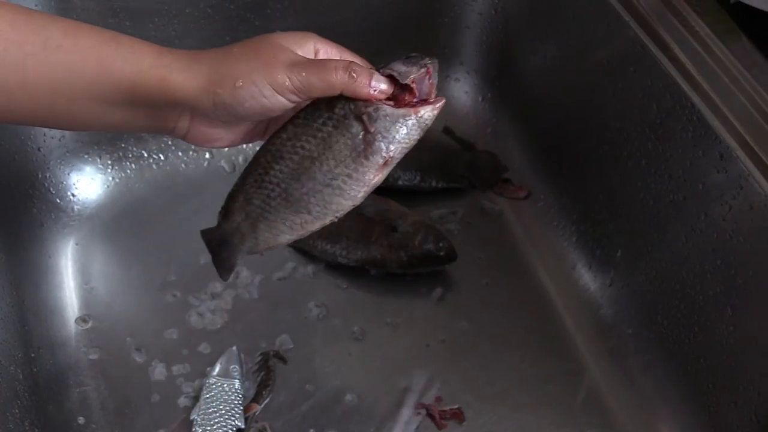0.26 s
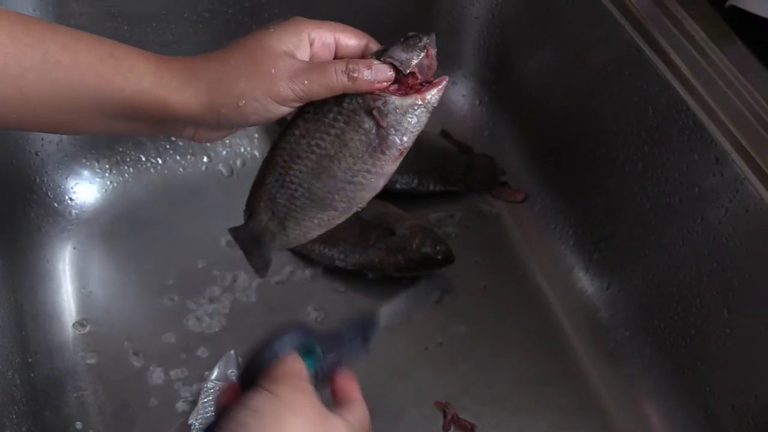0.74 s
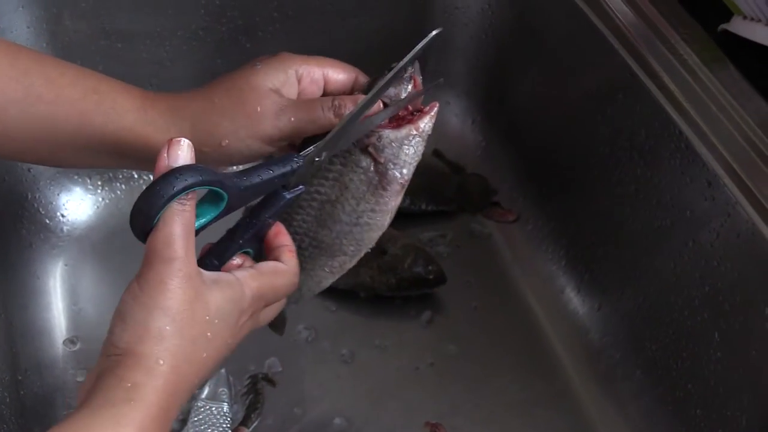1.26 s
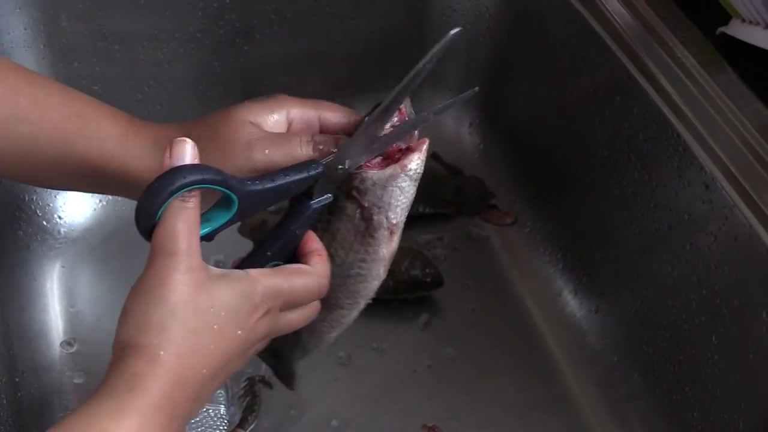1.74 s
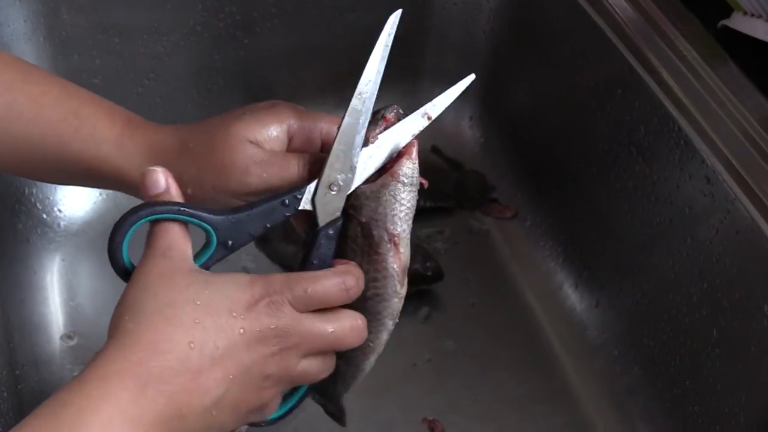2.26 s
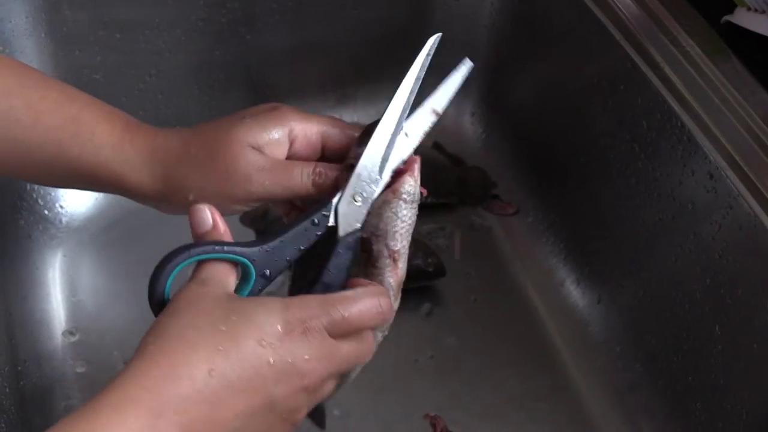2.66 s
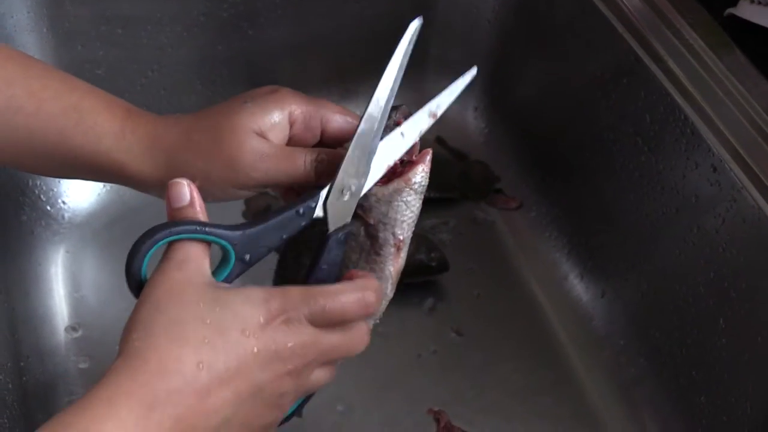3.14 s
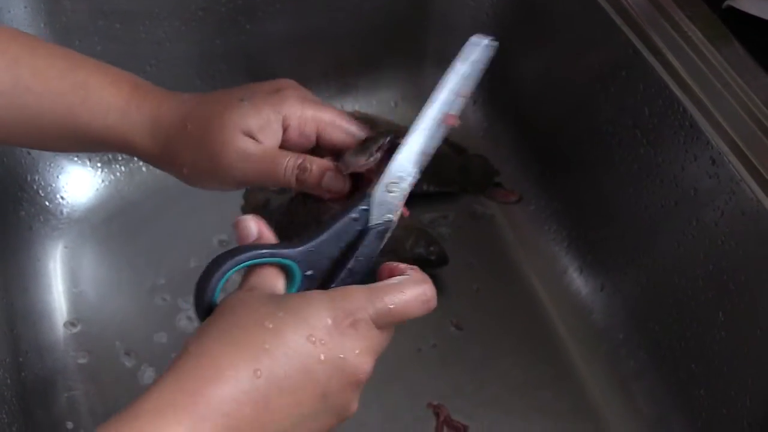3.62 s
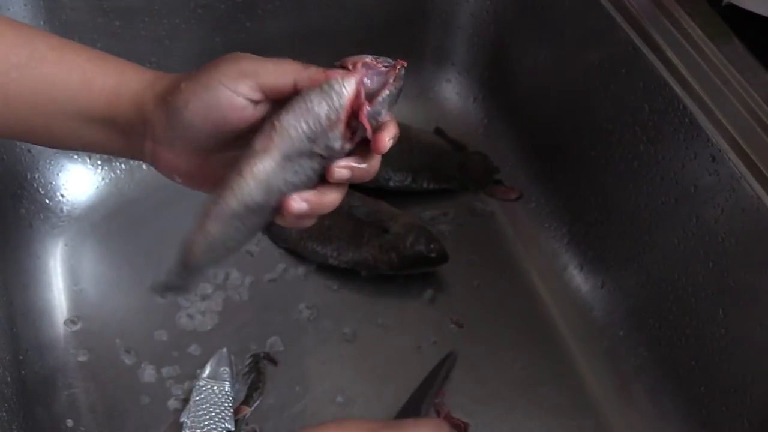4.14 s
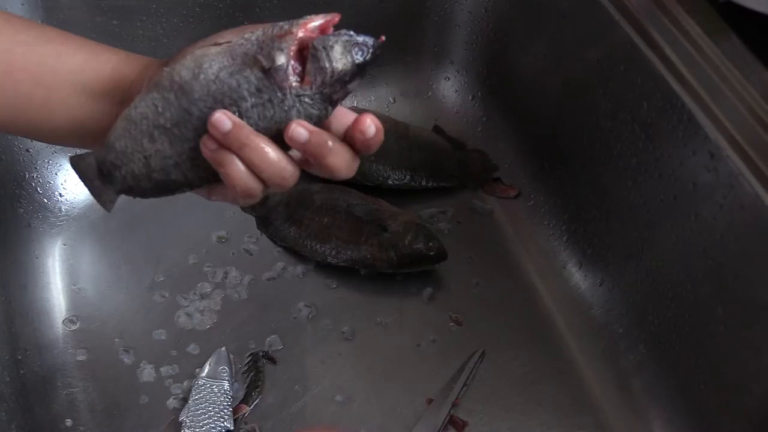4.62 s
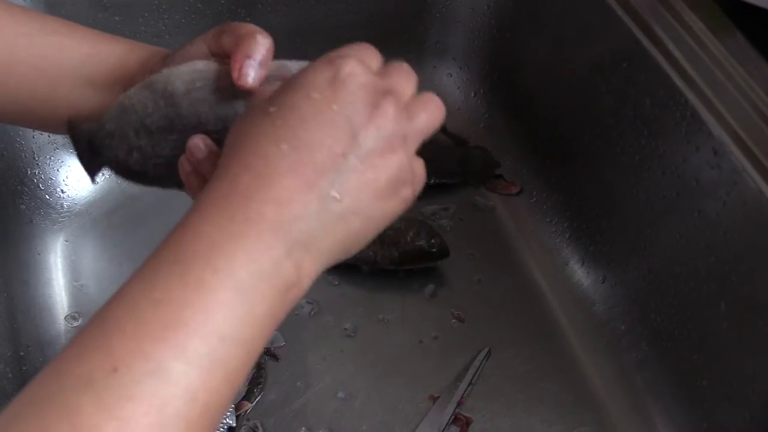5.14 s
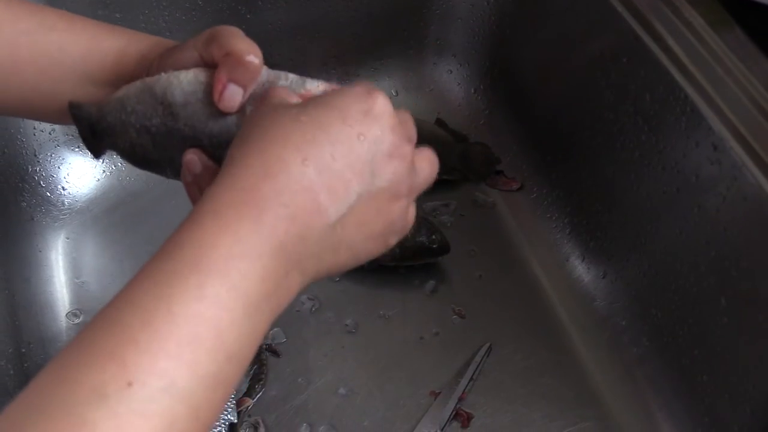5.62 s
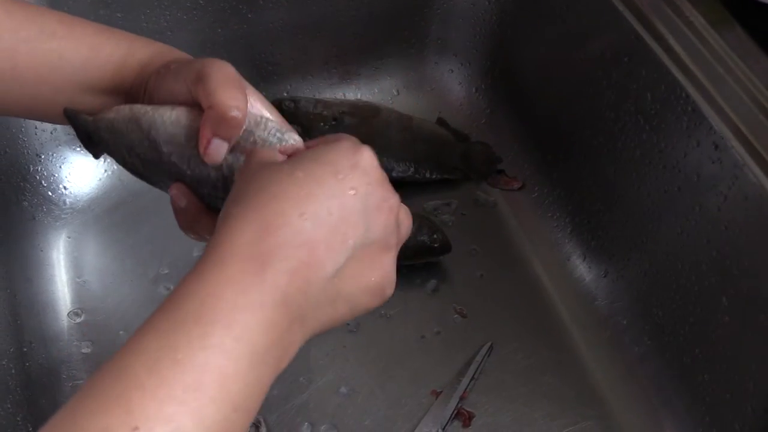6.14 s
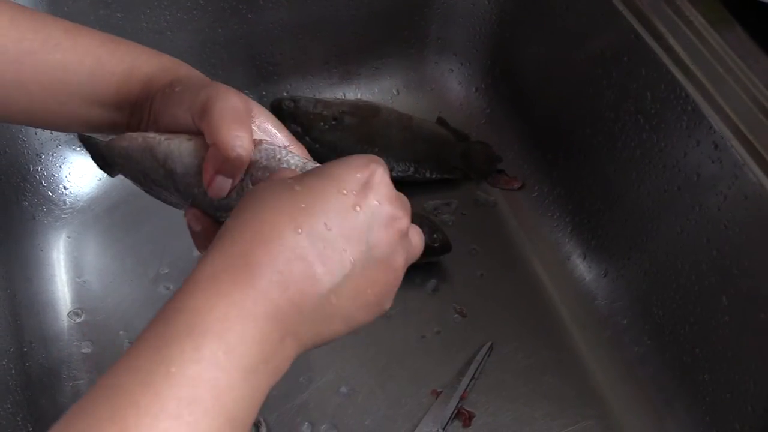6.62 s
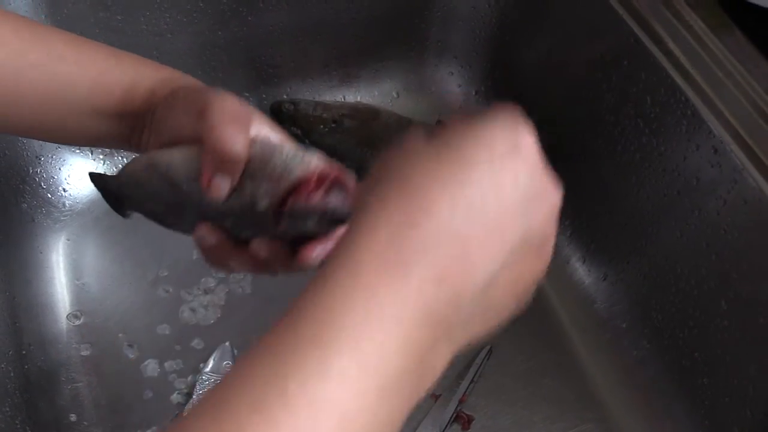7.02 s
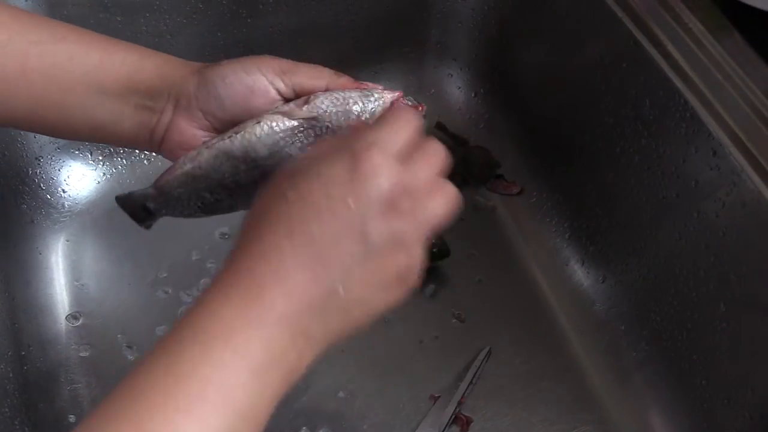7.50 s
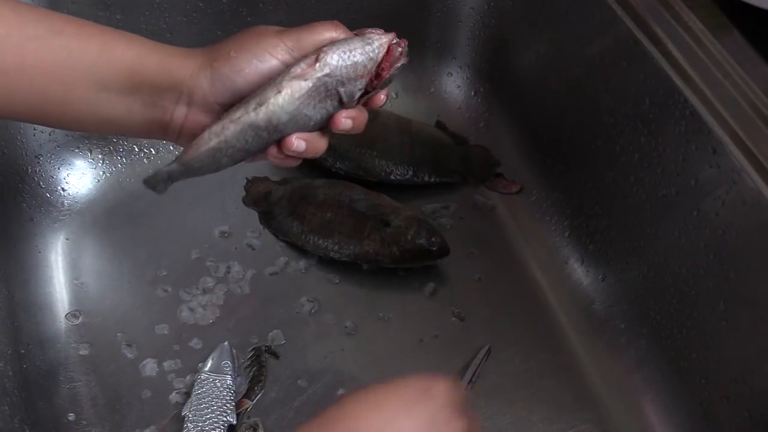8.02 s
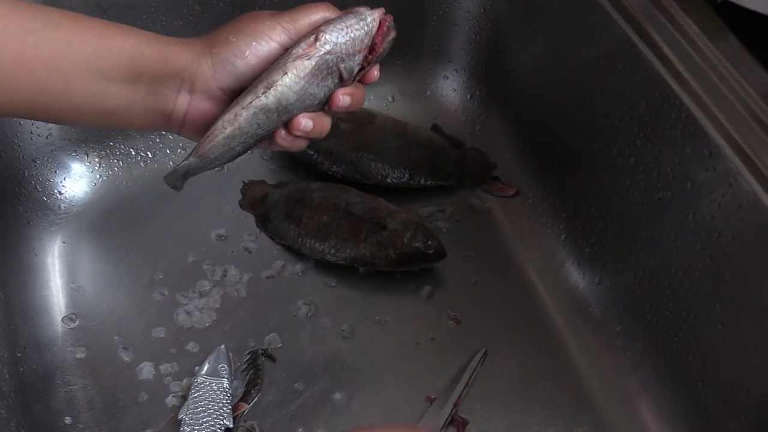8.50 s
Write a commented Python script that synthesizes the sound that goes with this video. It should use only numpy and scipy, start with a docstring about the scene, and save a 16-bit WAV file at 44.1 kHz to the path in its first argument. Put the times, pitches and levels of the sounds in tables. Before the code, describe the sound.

Kitchen scissors snip and crunch through a small fish, with bones snapping and a few booming knocks on a steel sink.

```python
"""Scissors and fish at a steel sink

Close to the basin, kitchen scissors work on a small fish: the blades rub and crunch, fins and bones
snap. Things knock the basin, which booms and rings, and steel slides over it. Behind them lie a quiet
kitchen's air, a wavering very low hum, a faint tone and the hiss of the stereo microphone."""
import sys
import numpy as np
from scipy import signal
from scipy.fft import rfft, irfft, next_fast_len
from scipy.io import wavfile
from scipy.ndimage import map_coordinates

SR = 44100
rng = np.random.default_rng(int(sys.argv[2]) if len(sys.argv) > 2 else 0)


def persist_wave(psi):
    """Save psi, clipped to +-1, as 16-bit WAV."""
    counts = np.round(np.clip(psi, -1, 1) * 32767).astype(np.int16)
    wavfile.write(sys.argv[1], SR, np.atleast_2d(counts).T)


N = 386316


def amp(db):
    """Gain of a level in dB."""
    return 10 ** (np.asarray(db) / 20)


def unit(x):
    """x at rms 1."""
    return x / np.sqrt(np.mean(x ** 2) + 1e-20)


def along(points, hz):
    """Value at hz between (f/Hz, value) points, on a log axis."""
    f, values = np.transpose(points)
    return np.interp(np.log(hz + 1), np.log(f + 1), values)


def curves(rows, outside=None):
    """One value per sample for each column after the time."""
    times, *columns = np.transpose(rows)
    return [np.interp(np.arange(N) / SR, times, column, outside, outside) for column in columns]


def filtered(x, response):
    """x through a complex frequency response."""
    n = x.shape[-1]
    size = next_fast_len(2 * n)
    return irfft(rfft(x, size) * response(np.fft.rfftfreq(size, 1 / SR)), size)[..., :n]


def resonant(modes):
    """Response of (f/Hz, width/Hz, level/dB) resonances, alternating in sign."""
    return lambda f: sum((-1) ** k * amp(db) * 1j * f * width / (hz * hz - f * f + 1j * f * width)
                         for k, (hz, width, db) in enumerate(modes))


def steep(hz, width_hz):
    """A resonance passed twice, for steep flanks."""
    return lambda f: resonant([(hz, width_hz, 0)])(f) ** 2


def coloured(points):
    """Response through (f/Hz, level/dB) points."""
    return lambda hz: amp(along(points, hz))


def grains(n, spread_db):
    """Noise whose samples scatter widely in size: a crackle."""
    return rng.standard_normal(n) * amp(spread_db * rng.standard_normal(n))


def wobble(per_s):
    """A smooth random curve with per_s knots a second."""
    knots = rng.standard_normal(int(N * per_s / SR) + 4)
    return map_coordinates(knots, [np.arange(N) * per_s / SR])


def add(track, s, sound):
    """Lay a sound into a track at s seconds."""
    track[round(s * SR):][:len(sound)] += sound


def friction(strokes, layers, rise_db_per_s, fall_db_per_s):
    """Every stroke swells, holds and fades, each noise layer at its own level."""
    out, t = np.zeros(N), np.arange(N) / SR
    for s, hold, *levels_db in strokes:
        end = s + abs(hold)
        near = slice(max(round((s - .2) * SR), 0), round((end + .4) * SR))
        rise_db = -rise_db_per_s * np.maximum(s - t[near], 0)
        fall_db = -fall_db_per_s * np.maximum(t[near] - end, 0)
        out[near] += sum(amp(db + rise_db + fall_db) * layer[near] for db, layer in zip(levels_db, layers))
    return out


# Room air and microphone hiss: f/Hz, relative density/dB
AIR_SPECTRUM = [(14, -20), (22, -7), (31, -3.5), (39, -19.5), (50, -22), (62, -22.5), (82, -31),
                (145, -29.5), (200, -36), (250, -32), (409, -40), (600, -40.5), (790, -38.5), (1000, -43.5),
                (1850, -50), (2530, -51), (3030, -52.5), (14400, -57), (16000, -58)]
# Likeness of the microphone's two sides: f/Hz, correlation
AIR_LIKENESS = [(60, 0.88), (150, 0.92), (380, 0.75), (950, 0.87), (2380, 0.49), (5980, 0.19),
                (15000, 0.058)]
def kitchen_air(mid_band_db=-66.5):
    """Steady air and hiss all around, alike on both sides in the bass, wide in the treble."""
    def mid_and_side(hz):
        angle = np.arccos(np.clip(along(AIR_LIKENESS, hz), -1, 1)) / 2
        return amp(along(AIR_SPECTRUM, hz)) * [np.cos(angle), np.sin(angle)]
    mid, side = filtered(rng.standard_normal((2, N)), mid_and_side)
    mid_band = filtered(mid, lambda hz: (hz > 150) & (hz < 1500))
    return np.array([mid + side, mid - side]) / np.std(mid_band) * amp(mid_band_db)


# Hum underneath the room: t/s, f/Hz, level/dB
LOW_HUM = [(0.0, 24.3, -46), (1.15, 23, -40), (1.51, 23.61, -49.5), (1.66, 24.9, -50), (1.95, 25.0, -43),
           (2.27, 22.07, -44), (3.27, 21.95, -43.5), (3.58, 23.7, -42.5), (4.66, 23.38, -46.5),
           (4.78, 26.4, -48), (4.9, 25.5, -45), (5.25, 22.03, -49), (5.39, 22.76, -36.5),
           (5.51, 22.16, -49.5), (7.22, 22.1, -38), (7.49, 23.28, -50), (8.61, 23.7, -46.5),
           (8.76, 20.4, -46)]
def low_hum(waver_db=3.5):
    """A very low sine wavers in pitch and level."""
    hz, db = curves(LOW_HUM)
    gain = amp(db + waver_db * wobble(per_s=7.7))
    return np.sqrt(2) * gain * np.sin(2 * np.pi * np.cumsum(hz) / SR)


# Tone in the background: t/s, f/Hz, level/dB
FAINT_TONE = [(0.9, 249.9, -81), (1.08, 280.5, -74.5), (1.24, 249.8, -78.5), (2.38, 270.4, -70),
              (2.42, 253.3, -79.5), (2.89, 250.7, -76), (2.93, 285.5, -74), (3.2, 294.1, -73)]
def faint_tone():
    """An unsteady low note comes and goes."""
    hz, db = curves(FAINT_TONE, outside=-150)
    return np.sqrt(2) * amp(db) * np.sin(2 * np.pi * np.cumsum(hz) / SR)


# Reflections inside the sink: f/Hz, t60/s
SINK_DECAY = [(300, 0.54), (1800, 0.33), (4800, 0.27), (12800, 0.14)]
def sink_reflections(x):
    """Each frequency dies at its own speed; a fresh noise tail per block keeps the reflections
    smooth, without ringing."""
    out = np.zeros((2, N + SR))
    block_samples, delay_samples, width = SR // 16, 150, 0.009
    for start in range(0, N, block_samples):
        hz, t, spectra = signal.stft(rng.standard_normal((2, SR // 3)), SR, nperseg=256)
        decay = amp(-60 * t / along(SINK_DECAY, hz)[:, None]) * (hz[:, None] > 500)
        mid, side = signal.istft(spectra * decay, SR, nperseg=256)[1]
        response = np.array([mid + width * side, mid - width * side]) / np.linalg.norm(mid)
        tail = signal.fftconvolve(x[None, start:start + block_samples], response, axes=1)
        out[:, start + delay_samples:][:, :tail.shape[1]] += tail
    return out[:, :N]


# High, middle and low resonances of dragged steel: f/Hz, width/Hz, relative level/dB
SCRAPE_MODES = [(1640, 390, 1), (1897, 104, 7), (2594, 87, 12), (3010, 360, 0), (3510, 260, 5.5),
                (4180, 440, 0), (4520, 310, 3.5), (5400, 310, 2.5), (6410, 650, 0)]
DRONE_MODES = [(530, 100, 1.5), (830, 215, -7), (1134, 280, -10)]
RUMBLE_MODES = [(100, 93, 6.5), (183.6, 83, 4.5), (316, 246, -10.5)]
# Rasp at the contact: f/Hz, relative level/dB
RASP_SPECTRUM = [(2500, 5), (4000, -3.5), (5500, -10), (8000, -7.5), (11000, -14), (16000, -32)]
# Slides on the basin: t/s, hold/s, scrape/dB, drone/dB, rumble/dB, rasp/dB
STEEL_SLIDES = [(.05, .004, -78, -60, -44, -79), (.13, .03, -82, -68, -60.5, -85),
                (.225, .02, -87, -68, -50, -75), (.27, 0.046, -79, -72, -55, -64),
                (.34, 0.0091, -51.5, -52, -41.5, -60), (.4, 0.043, -78, -74, -55, -77),
                (.47, 0.038, -67.5, -59, -59.5, -70), (.56, .03, -59.5, -54.5, -60, -70),
                (4.22, 0.056, -56.5, -54, -50, -56.5), (4.3, 0.053, -57.5, -61, -55, -56.5),
                (4.385, 0.023, -70, -59.5, -62, -70), (8.36, 0.022, -75, -70, -56.5, -93),
                (8.43, 0.044, -83, -74, -65, -91), (8.515, 0.013, -88, -71, -54, -88)]
def steel_slides():
    """Steel dragged over steel: each resonance swells and fades as the contact shifts."""
    def shifting(modes):
        return unit(sum(amp(db + 2.8 * wobble(per_s=25))
                        * filtered(grains(N, spread_db=3), steep(hz, width_hz))
                        for hz, width_hz, db in modes))
    layers = [shifting(modes) for modes in (SCRAPE_MODES, DRONE_MODES, RUMBLE_MODES)]
    rasp = unit(filtered(grains(N, spread_db=3), coloured(RASP_SPECTRUM)))
    return friction(STEEL_SLIDES, layers + [rasp], rise_db_per_s=600, fall_db_per_s=457)


# Modes of the steel basin: f/Hz, relative level/dB, t60/s
BASIN_MODES = [(72.6, -8, 0.12), (103.8, -1, 0.17), (131.8, 5, 0.17), (143, -3, 0.36), (175, -1.5, 0.53),
               (222.5, -6.5, 0.46), (253, -0.5, 0.24), (304, -29, .1), (412, -12, 0.28), (529.7, 6.5, 0.13),
               (557, -27, 0.14), (845, -23, 0.11), (917, -4.5, 0.27), (987, -2, 0.17), (1195, -1.5, 0.17),
               (1277, -4, 0.15), (1782, 1, 0.065)]
# Clatter of a blow: f/Hz, relative density/dB
CLATTER_SPECTRUM = [(710, 7.5), (1200, -3), (2000, -5.5), (2510, 1), (2980, -6.5), (3290, -4.5),
                    (4080, -5.5), (10500, -26.5), (15200, -39), (16000, -63)]
# Blows on the basin: t/s, clatter/dB, its tilt/(dB per octave), boom/dB, favoured f/Hz,
# thud/dB, clang/dB, ring length as a share of the free basin's
BASIN_BLOWS = [(.012, -75, 1, -34.5, 129, -37, -62.5, 0.84), (.181, -59, 4, -36, 252, -25.5, -59.5, 0.31),
               (.352, -37.5, 5.5, -42, 124, -32, -59, 0.62),
               (4.195, -29.5, 10, -20.5, 172.3, -18, -40.5, 0.79),
               (4.546, -69, -1.5, -53, 196.6, -41, -68, 0.71), (4.612, -30.5, 5, -26, 238, -26, -39, 0.48),
               (4.675, -26.5, 7.5, -27.5, 142, -26, -34.5, 0.91),
               (8.597, -70, -6, -40.5, 219, -32, -67, 0.98),
               (8.633, -27.5, 3.5, -24.5, 201.7, -21, -39.5, 0.54),
               (8.684, -37.5, 0.3, -44, 137.8, -31, -51.5, 0.68)]
def basin_knocks(boom_fall_db_per_octave=16.5, dull_t60_s=0.13, clatter_t60_s=0.048):
    """A blow rings the deep, low and higher modes, with a dull burst of noise and a clatter."""
    out, t = np.zeros(N + SR), np.arange(SR // 2) / SR
    for s, clatter_db, tilt, boom_db, favoured_hz, thud_db, clang_db, length in BASIN_BLOWS:
        for hz, mode_db, t60 in BASIN_MODES:
            mode_boom_db = boom_db - boom_fall_db_per_octave * abs(np.log2(hz / favoured_hz))
            blow_db = thud_db if hz < 115 else mode_boom_db if hz < 330 else clang_db
            # the contact lasts a few ms, so the modes start out of step
            cycles = hz * rng.normal(1, 0.01) * t + rng.uniform(0, 0.21)
            wave = np.sin(2 * np.pi * cycles) * (1 - np.exp(-t / 0.0021))
            add(out, s, amp(blow_db + mode_db + rng.normal(0, 3) - 60 * t / (t60 * length)) * wave)
        dull = unit(filtered(rng.standard_normal(len(t)), steep(hz=890, width_hz=940)))
        add(out, s, amp(clang_db - 3.5 - 60 * t / dull_t60_s) * dull)
        tilted = lambda hz: amp(along(CLATTER_SPECTRUM, hz) + tilt * np.log2(1 + hz / 3000))
        clatter = unit(filtered(grains(len(t), spread_db=7), tilted))
        add(out, s, amp(clatter_db - 60 * t / clatter_t60_s) * clatter)
    return out[:N]


# Resonances of bare blades, blades in flesh and a wet hollow: f/Hz, width/Hz, relative level/dB
BLADE_MODES = [(2377, 56, 6), (2600, 220, 7)]
CRUNCH_MODES = [(2660, 390, 5), (1560, 500, -4)]
HOLLOW_MODES = [(740, 520, 18), (1350, 2800, 2.5)]
# Gritty noise of the blades: f/Hz, relative level/dB
GRIT_SPECTRUM = [(1200, -34), (2000, 0), (3000, 5.5), (4500, 11), (7000, -5.5), (11000, -19), (16000, -9)]
# Bare blades rubbing: t/s, hold/s, ring/dB, squelch/dB, grit/dB
BARE_STROKES = [(1.088, 0.12, -81, -95, -97), (1.612, 0.12, -73, -95, -81), (1.744, 0.0037, -61, -79, -71),
                (1.852, 0.0045, -73, -89, -84), (2.182, 0.095, -78, -75, -82),
                (2.468, 0.0027, -72, -59, -66), (2.5, 0.0077, -56, -64, -62), (2.525, .03, -80, -82, -70),
                (3.188, .035, -67.5, -72, -81), (3.42, .004, -71, -84, -73), (3.486, .05, -73, -75, -72),
                (3.552, 0.02, -75, -74, -69), (5.42, 0.015, -68, -68.5, -71), (8.27, .22, -80, -86, -88)]
# Blades deep in flesh: t/s, hold/s, crunch/dB, squelch/dB, grit/dB
FLESH_STROKES = [(1.374, 0.038, -70, -65, -70), (2.69, 0.023, -75, -61.5, -72),
                 (2.736, 0.003, -62, -54, -70), (2.764, .004, -65.5, -64, -67),
                 (3.088, 0.029, -68.5, -63, -73)]
def scissors():
    """Bare blades ring as they rub; flesh damps the ring to a crunch and squelches in a hollow."""
    hollow = lambda hz: resonant(HOLLOW_MODES)(hz) ** 2
    bodies = resonant(BLADE_MODES), resonant(CRUNCH_MODES), hollow, coloured(GRIT_SPECTRUM)
    ring, crunch, squelch, grit = [unit(filtered(grains(N, spread_db=7), body)) for body in bodies]
    rubs = friction(BARE_STROKES, (ring, squelch, grit), rise_db_per_s=805, fall_db_per_s=707)
    cuts = friction(FLESH_STROKES, (crunch, squelch, grit), rise_db_per_s=502, fall_db_per_s=260)
    return rubs + cuts


# Fins and bones breaking over the sink, and a drip at 7.9 s: t/s, ring f/Hz, ring/dB, hiss f/Hz, hiss/dB,
# body/dB
BONE_SNAPS = [(0.052, 2610, -64, 4500, -73, -65), (0.084, 2380, -75, 4580, -69, -63),
              (0.2217, 3520, -65, 5080, -70, -62), (0.252, 3580, -60, 5150, -57.5, -65),
              (0.3523, 2740, -38.5, 6100, -59, -64), (0.5107, 2560, -54, 4540, -68, -57),
              (0.5705, 1977, -50, 4440, -59, -51), (0.8413, 2660, -60, 4600, -61, -77),
              (1.0882, 2415, -64, 6630, -76, -79), (1.7382, 2410, -52, 5300, -65, -70),
              (1.853, 2350, -62.5, 5000, -75, -75), (2.448, 2400, -41, 6190, -42, -69),
              (2.4563, 2220, -51, 6180, -51, -62), (2.462, 2390, -66, 6160, -47, -56),
              (2.4756, 2560, -48, 5510, -42.5, -49), (2.4916, 2620, -43, 5330, -45, -48),
              (2.543, 2430, -54.5, 6010, -56.5, -69), (2.676, 2830, -65, 5020, -70, -68),
              (2.7047, 2780, -60, 4330, -72, -54), (2.7634, 3530, -49, 5700, -43.5, -53),
              (3.08, 2740, -67, 4597, -76, -59), (3.1883, 2330, -57.5, 5013, -77, -66),
              (3.418, 2353, -67, 4900, -72, -71), (3.482, 2257, -71, 4575, -63, -70),
              (3.494, 2400, -70, 8000, -59, -68), (3.507, 2400, -70, 7000, -61, -68),
              (3.545, 2320, -53.5, 4516, -60, -63), (3.555, 2400, -66, 7000, -63, -70),
              (3.568, 2380, -71, 9550, -59, -74), (5.381, 2600, -49.5, 6740, -47.5, -66),
              (5.4069, 2530, -52, 5900, -53.5, -67), (6.4423, 2292, -68, 6540, -61, -72),
              (6.451, 2470, -62, 7160, -64.5, -59), (6.626, 3030, -49.5, 6450, -46.5, -52.5),
              (6.6396, 2626, -55, 6410, -58, -59), (6.8021, 2798, -44, 6070, -47.5, -52.5),
              (7.0786, 3186, -47, 4300, -42.5, -47), (7.7607, 2625, -66, 4846, -59.5, -75),
              (7.898, 2592, -73, 6220, -65, -77), (8.133, 2334, -60.5, 4566, -68, -73)]
def bone_snaps(crackle_t60_s=0.065, tick_t60_s=0.013, body_hz=1350):
    """A break (or the drip) and its dying crackle: a bare tick, a short ring, a bright hiss and a fleshy body."""
    out, t = np.zeros(N + SR), np.arange(SR // 5) / SR
    envelope = amp(-60 * t / crackle_t60_s) * (1 - np.exp(-t / 0.0019))
    for s, ring_hz, ring_db, hiss_hz, hiss_db, body_db in BONE_SNAPS:
        crackle = grains(len(t), spread_db=7)
        bands = (ring_hz, 800, ring_db), (hiss_hz, 4800, hiss_db), (body_hz, 900, body_db)
        for hz, width_hz, db in bands:
            add(out, s, amp(db) * envelope * unit(filtered(crackle, steep(hz, width_hz))))
        tick = filtered(rng.standard_normal(len(t)), resonant([(5700, 22000, 0)]))
        add(out, s, amp(hiss_db + 0.5 - 60 * t / tick_t60_s) * tick)
    return out[:N]


def scene():
    """The work is close and centred, with the sink's reflections just behind and the kitchen beyond."""
    hits = basin_knocks() + bone_snaps()
    rubbing = scissors() + steel_slides()
    reflections = sink_reflections(amp(-10.5) * hits + amp(-17) * rubbing)
    return hits + rubbing + reflections + kitchen_air() + low_hum() + faint_tone()


def record(dry):
    """The recorder keeps nothing above its band limit."""
    return filtered(dry, lambda hz: hz < 15850)


dry = scene()
out = record(dry)
persist_wave(out)
```